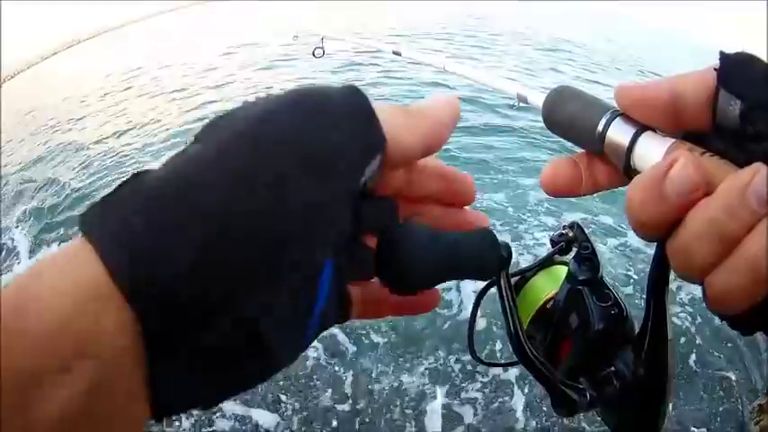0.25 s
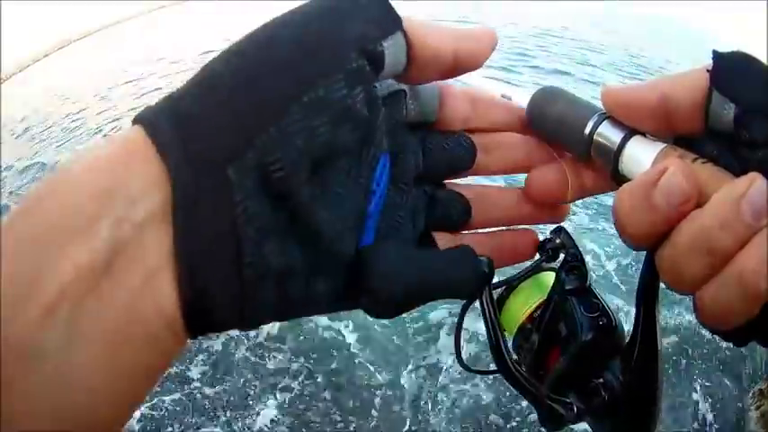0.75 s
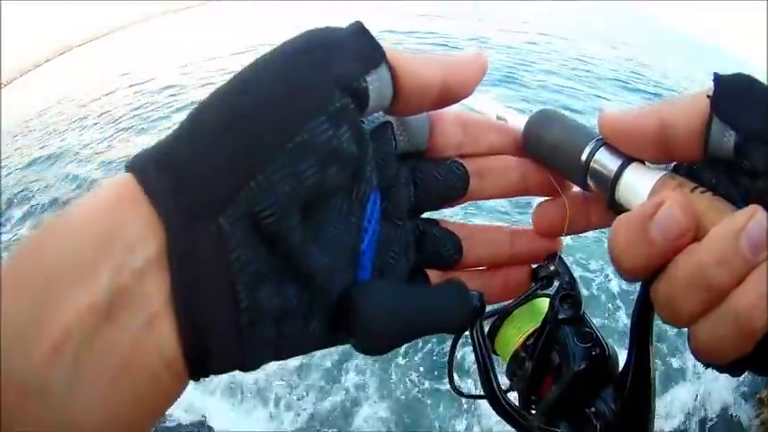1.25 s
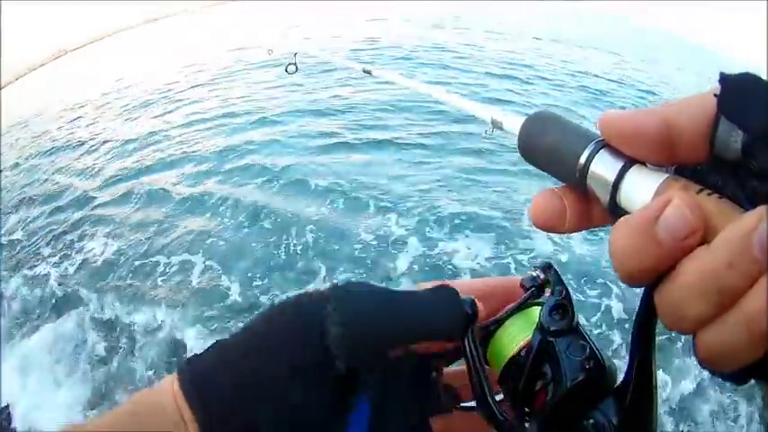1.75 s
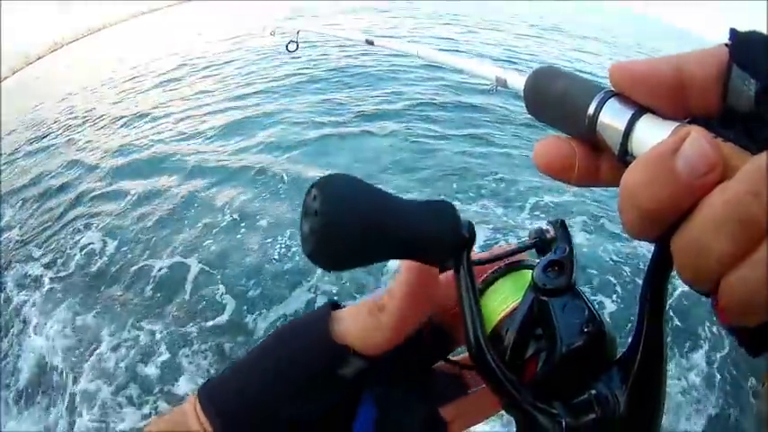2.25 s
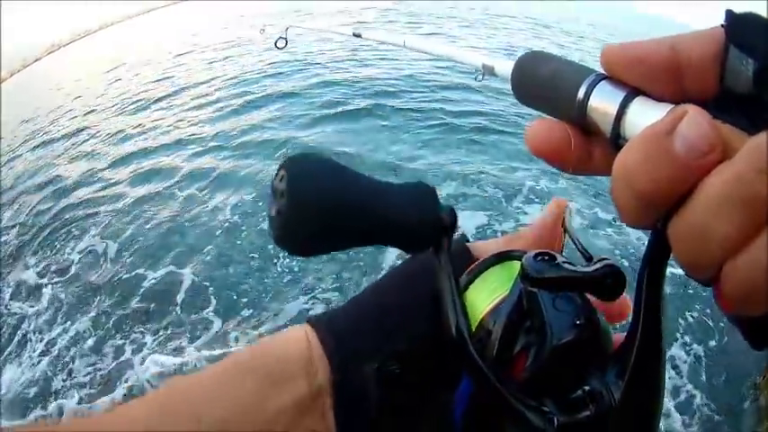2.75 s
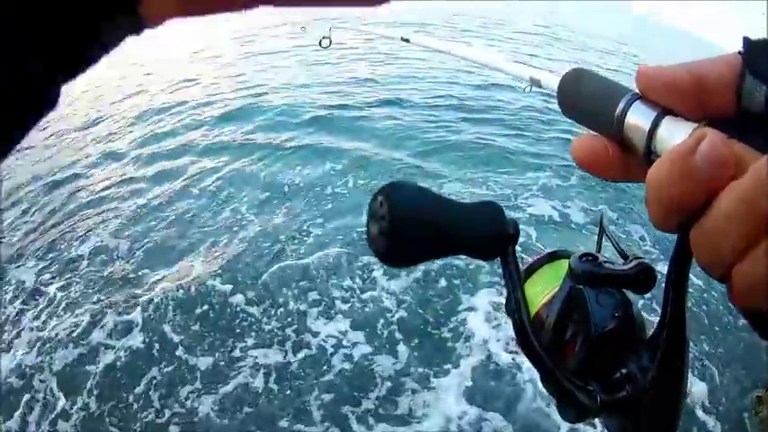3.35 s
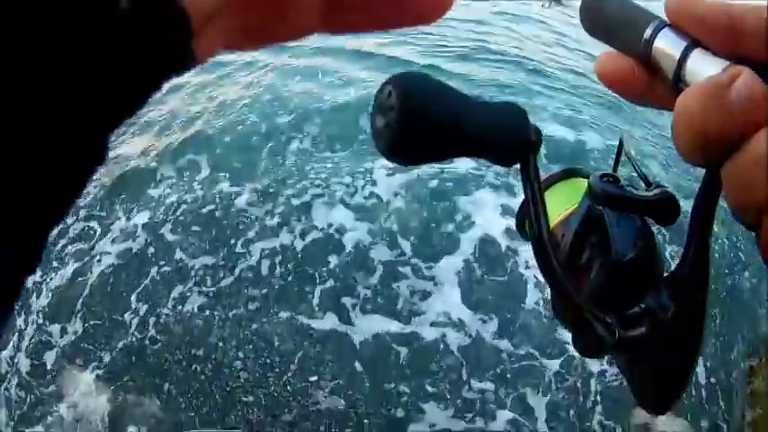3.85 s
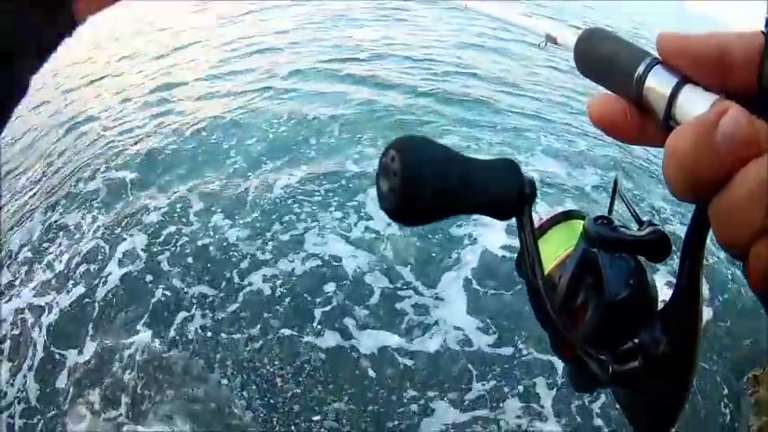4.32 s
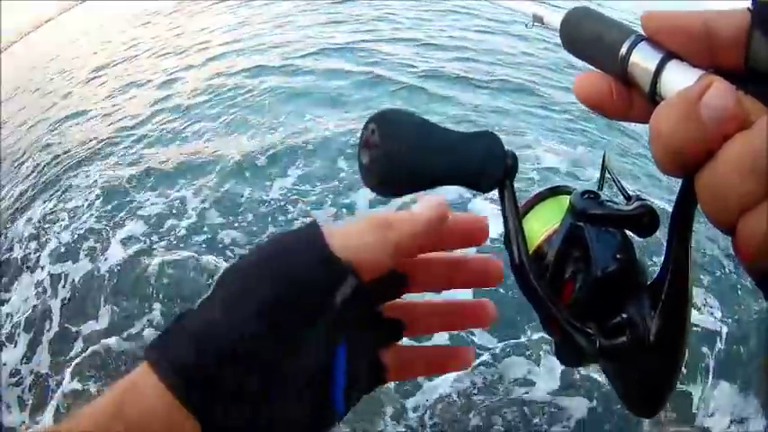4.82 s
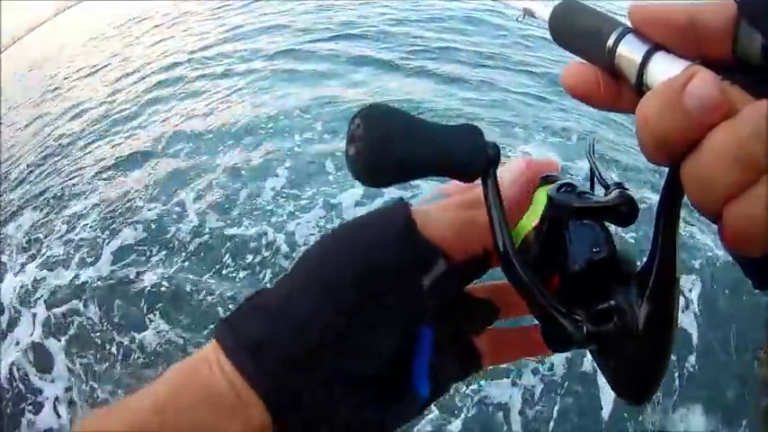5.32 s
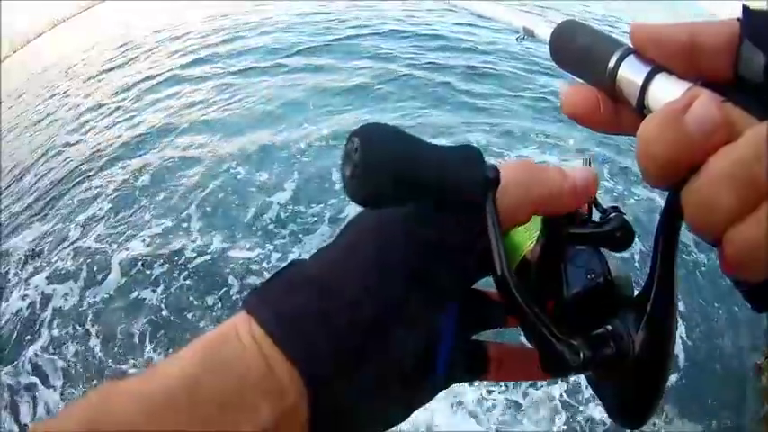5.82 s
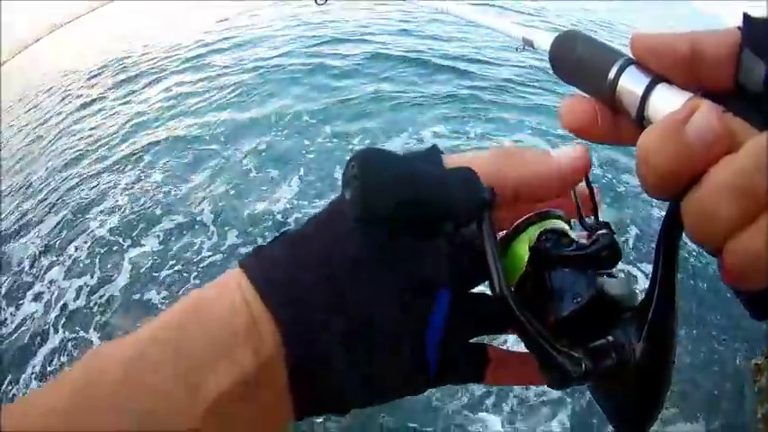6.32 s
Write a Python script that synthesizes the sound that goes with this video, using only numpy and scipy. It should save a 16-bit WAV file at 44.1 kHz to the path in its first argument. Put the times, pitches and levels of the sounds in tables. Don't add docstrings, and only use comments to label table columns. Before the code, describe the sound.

Small waves wash over stones, with bubbling trickles and fizzing foam, heard through a hard camera case that gives a hollow, boxy colour. A swell crests early, then drains to calm lapping. In the lull comes a very loud sharp knock on the case, a duller thump with a short squeak, then a hard metallic reel clack. A second, softer choppy swell follows over faint hum and hiss.

```python
import sys
import numpy as np
from scipy import signal
from scipy.fft import rfft, irfft, next_fast_len
from scipy.io import wavfile
from scipy.ndimage import uniform_filter1d, map_coordinates

SR = 44100
rng = np.random.default_rng(int(sys.argv[2]) if len(sys.argv) > 2 else 0)


def magnitude_from_level(level_db):
    exponent = np.asarray(level_db, float) / 20
    return 10 ** exponent


def unload_audio(sound):
    columns = np.transpose(np.atleast_2d(sound))
    steps = np.round(np.clip(columns, -1, 1) * 32767)
    wavfile.write(sys.argv[1], SR, steps.astype(np.int16))


N = 290178

# (frequency [Hz], level [dB per Hz])
WASH = [(200, -14), (600, -12.5), (1200, -10), (1600, -4.5), (2000, -17.5), (2500, -35), (5000, -74)]
# (frequency [Hz], level [dB per Hz])
FOAM = [(2000, -16), (2900, 0), (4500, -4), (5300, -12), (7200, -15), (8000, -23.5), (9500, -27)]
# (frequency [Hz], width [Hz], level [dB])
CAVITY = [(1413, 170, 6), (1860, 200, 2.5), (2320, 200, 3), (2780, 260, -6), (2810, 120, 9.5),
          (3430, 200, 9), (4010, 200, 4), (4310, 200, 7.5), (4640, 204, 5), (5760, 300, 4.5),
          (7000, 380, 8)]


def unit(x):
    return x / np.sqrt(np.mean(x ** 2) + 1e-20)


def along(points, hz):
    f, v = np.transpose(points)
    return np.interp(np.log(hz + 1), np.log(f + 1), v)


def wobble(rate):
    knots = rng.standard_normal(int(N * rate / SR) + 4)
    return map_coordinates(knots, [np.arange(N) * rate / SR])


def coloured(x, spectrum, peaks=()):
    m = next_fast_len(N + 8192)
    hz = np.fft.rfftfreq(m, 1 / SR)
    db = along(spectrum, hz)
    for centre, width, top_db in peaks:
        db = db + top_db / (1 + (2 * (hz - centre) / width) ** 2)
    return unit(irfft(rfft(x, m) * magnitude_from_level(db), m)[:N])


def patchy(depth_db):
    z = signal.stft(rng.standard_normal(N), nperseg=512)[2]
    field = uniform_filter1d(rng.standard_normal(z.shape), size=6, axis=0)
    field = uniform_filter1d(field, size=10, axis=1)
    return unit(signal.istft(z * magnitude_from_level(depth_db * unit(field)), nperseg=512)[1][:N])


def bubbles(count, centre_hz, spread, cycles, size_db):
    draw, t = rng.random((count, 2)), np.arange(400) / SR
    hz = np.clip(centre_hz * np.exp(spread * rng.standard_normal((count, 1))), 150, 9000)
    size = magnitude_from_level(size_db * draw[:, 1:])
    u = t * hz / cycles
    swing = np.sin(2 * np.pi * hz * t * (1 + 0.067 * u))
    tone = size * swing * u * np.exp(-3 * u)
    at = (draw[:, :1] * N).astype(int) + np.arange(len(t))
    return unit(np.bincount(at.ravel(), tone.ravel(), N + len(t))[:N])


def flow(spray, ebb=1):
    # (crest time [s], strength [dB], building [dB/s], draining [dB/s],
    # spray over strength [dB])
    waves = [(.4, -67.5, 20, 20, -2), (.93, -59, 29, 11, 1), (1.2, -59, 18, 12, 2),
             (1.57, -49, 27, 35, -1.5), (1.85, -54.5, 30, 18, -1), (2.1, -52, 23, 21, 0.5),
             (2.33, -62.5, 14, 51, 1.5), (2.6, -67, 42, 43, 1.5), (2.9, -63.5, 27, 25, 2),
             (3.55, -63, 17, 11, -0.5), (4.75, -63.5, 29, 20, -2), (4.99, -58.5, 36, 63, -0.5),
             (5.22, -57, 49, 40, -2), (5.31, -52, 80, 80, -0.5), (5.42, -57, 39.5, 30, -3.5),
             (5.8, -62, 110, 40, 4), (5.91, -54, 45, 70, 4), (6.16, -64, 43, 12, 2)]
    calm_db, crest_s = -70.5, 0.017
    crest, db, builds, drains, spray_db = np.transpose(waves)[:, :, None]
    t = np.arange(0, N + 64, 64) / SR
    slope = np.where(t < crest, builds, ebb * drains)
    fall_db = slope * (np.hypot(t - crest, crest_s) - crest_s)
    power = (magnitude_from_level(db + spray * spray_db - fall_db) ** 2).sum(axis=0) + magnitude_from_level(calm_db) ** 2
    return np.interp(np.arange(N) / SR, t, 10 * np.log10(power) + 60)


def wash(splash):
    drops = bubbles(count=6000, centre_hz=1208, spread=.4, cycles=3.8, size_db=7.5)
    water = coloured(patchy(0.41) + 0.26 * drops, WASH, CAVITY)
    return magnitude_from_level(flow(0) - 60 + splash) * water


def trickle(splash):
    # (frequency [Hz], level [dB per Hz])
    trickle_colour = [(1000, -28.5), (1500, -1.5), (1800, -2), (2200, -4), (2500, -16), (3000, -41.5)]
    drops = bubbles(count=4000, centre_hz=2003, spread=0.18, cycles=6, size_db=12)
    water = coloured(patchy(0.87) + 0.25 * drops, trickle_colour, CAVITY)
    return magnitude_from_level(-68 + .9 * flow(1.4) + splash) * water


def cupped(fizz):
    comes_s, leaves_s, band_hz, level_db = .45, 1.7, (4400, 4800), -13
    t = np.arange(N) / SR
    near = np.clip(np.minimum(t - comes_s, leaves_s - t) / .15, 0, 1)
    band = signal.butter(1, band_hz, "band", fs=SR, output="sos")
    return magnitude_from_level(level_db) * near * unit(signal.sosfilt(band, fizz))


def foam(splash):
    drops = bubbles(count=9000, centre_hz=4190, spread=0.39, cycles=4, size_db=13)
    fizz = coloured(patchy(0.94) + 0.36 * drops, FOAM, CAVITY)
    level_db = -76.5 + 0.99 * flow(0.57)
    return magnitude_from_level(level_db + 0.49 * splash) * (fizz + cupped(fizz))


def surge(splash):
    # (frequency [Hz], level [dB per Hz])
    surge_colour = [(60, -23.5), (200, -2.5), (400, -2), (800, -1), (1300, -1), (2500, -51.5)]
    drops = bubbles(count=1500, centre_hz=450, spread=.45, cycles=3.45, size_db=9.5)
    water = coloured(patchy(1.4) + 0.21 * drops, surge_colour)
    level_db = -62.5 + .6 * flow(-.8, ebb=1.5)
    return magnitude_from_level(level_db + 0.34 * splash) * water


def distant_swell():
    # (frequency [Hz], level [dB per Hz])
    rumble_colour = [(12, -35), (20, -10.5), (60, -5.5), (128, -7.5), (149, -9), (235, -10), (269, -11),
                     (500, -23.5), (650, -57), (1100, -120)]
    return magnitude_from_level(-63.5 + 0.78 * wobble(6.2)) * coloured(patchy(0.98), rumble_colour)


def sea():
    splash = 0.34 * wobble(16) + 0.77 * wobble(45)
    return wash(splash) + trickle(splash) + foam(splash) + surge(splash) + distant_swell()


def electronics():
    # (frequency [Hz], rms level [dB], unsteadiness [Hz])
    hum_lines = [(58.5, -69.5, 21), (116.4, -71.5, 12), (169.5, -75.5, 23)]
    # (frequency [Hz], level [dB per Hz])
    hiss_colour = [(1500, -30.5), (2500, 4), (3200, -3.5), (4500, -6), (5000, -5.5), (6700, -7.5),
                   (8600, -8.5), (11500, -10), (12600, -7), (13500, -7), (15500, -5)]
    t = np.arange(N) / SR
    hum = np.zeros(N)
    for hz, db, drift in hum_lines:
        swell = 1 + 0.35 * wobble(drift)
        hum += magnitude_from_level(db) * unit(swell * np.sin(2 * np.pi * hz * t + 1.3 * wobble(drift)))
    return hum + magnitude_from_level(-76) * coloured(rng.standard_normal(N), hiss_colour)


def flexes(rows):
    out, t = np.zeros(N + SR), np.arange(SR // 8) / SR
    for s, db, hz, cycles in rows:
        u = t * hz / cycles
        out[round(s * SR):][:len(t)] -= magnitude_from_level(db + 12) * np.sin(2 * np.pi * hz * t) * u * np.exp(-3 * u)
    return out[:N]


def squeaks():
    # (time [s], level [dB], frequency [Hz], length [cycles])
    short_tones = [(3.631, -47, 1500, 9), (3.4875, -40, 1970, 7), (3.499, -42, 2240, 6.7),
                   (3.5045, -37, 1800, 5.8), (3.5065, -34, 2190, 7.1), (3.5205, -48, 1900, 6.6),
                   (3.8597, -24, 3460, 7.7), (3.864, -40, 4300, 36), (4.0725, -42, 2340, 13),
                   (4.1068, -35.5, 4300, 8.1), (.655, -62, 4970, 18), (2.7235, -59, 5800, 14),
                   (2.7235, -59, 4500, 12), (4.1068, -32.5, 2150, 9.5), (4.0515, -37, 1420, 9),
                   (4.0845, -53, 2570, 13), (3.868, -51, 7000, 36)]
    return flexes(short_tones)


def struck(hits, modes, split_hz, rise):
    out, t = np.zeros(N + SR), np.arange(SR // 8) / SR
    dull = coloured(rng.standard_normal(N), WASH, CAVITY)
    bright = coloured(rng.standard_normal(N), FOAM, CAVITY)
    for s, db, bright_db, dull_rattle_db, bright_rattle_db, rattle_t60 in hits:
        at = int(s * SR)
        u = np.maximum(t - (s - at / SR), 0)
        load = (1 - np.exp(-u / rise)) ** 2
        ring = np.zeros(len(t))
        for hz, level, t60 in modes:
            mode_db = level + bright_db * (hz > split_hz) - 60 * u / t60
            ring += magnitude_from_level(mode_db) * np.sin(2 * np.pi * hz * u)
        ring *= load
        rattle = magnitude_from_level(dull_rattle_db) * dull[at:][:len(t)] + magnitude_from_level(bright_rattle_db) * bright[at:][:len(t)]
        out[at:][:len(t)] += magnitude_from_level(db) * ring / np.abs(ring).max() + load * magnitude_from_level(-60 * u / rattle_t60) * rattle
    return out[:N]


def reel():
    # (time [s], blow [dB], fizz [dB])
    light = [
        (.66, -70, -65),
        (2.7226, -62, -63),
        (2.733, -70, -64),
        (3.4858, -58, -58),
        (3.703, -73, -70),
        (3.9455, -60.5, -62),
        (4.0445, -54, -65),
    ]
    # (time [s], blow [dB], bright [dB], rattle [dB], rattle t60 [s])
    heavy = [(3.4885, -64, -9, -62, .01), (3.4990, -61, 12, -46.5, 0.035), (3.506, -51, 8, -41, 0.0092),
             (3.5215, -64, 0, -59, .015), (4.0520, -43, -4, -49.5, 0.055), (4.071, -52, -4, -47, .037),
             (4.0813, -27.5, -15, -90, .01), (4.08414, -19, -15, -90, .01), (4.08465, -18.5, 8, -48, .02),
             (4.0884, -31, 5, -55, .04), (4.1062, -42, 7, -32, 0.012)]
    # (frequency [Hz], level [dB], t60 [s])
    reel_modes = [(433, -13, .04), (600, -8, .04), (880, 6, .0155), (1434, 2, .016), (1851, 9, .007),
                  (2113, -13, .014), (2387, 1, .004), (2696, -18, .017), (3336, -14, .011),
                  (4035, -26, .012), (5720, -36, .012), (7270, -27, .004)]
    ticks = [(s, db, 16, fizz - 14, fizz, 0.019) for s, db, fizz in light]
    clacks = [(s, db, bright, rattle, rattle - 9, t60) for s, db, bright, rattle, t60 in heavy]
    return struck(ticks + clacks, reel_modes, split_hz=2300, rise=.0002)


def bumps():
    # (time [s], level [dB], frequency [Hz], length [cycles])
    thuds = [(2.6, -47, 120, 1.4), (3.519, -50, 500, 3), (1.54, -46, 290, 3.5), (3.492, -36, 53.4, 1.8),
             (3.651, -40, 90, 0.96), (3.652, -45, 160, 1.5), (3.555, -51, 450, 4), (3.615, -48, 140, 1.6),
             (3.862, -25, 100, 1.4), (3.868, -31.5, 297, 1.9), (3.871, -31, 191, 3.1),
             (3.888, -38, 110, 1.2), (3.9745, -36, 170, 1.4), (3.9795, -41, 520, 2.2),
             (3.863, -29, 530, 7.1), (4.009, -42.5, 450, 3.1), (4.051, -41, 89, 1.3),
             (4.078, -29, 93, 0.59), (4.1068, -32.5, 567, 4.4), (5.228, -42, 170, 1.2),
             (5.305, -36.5, 700, 3.2)]
    return flexes(thuds)


def case_knocks():
    # (time [s], blow [dB], bright [dB], rattle [dB], rattle t60 [s])
    blows = [
        (3.64884, -14, 15, -90, .01),
        (3.64944, -.5, -7, -90, .01),
        (3.64999, -9.5, 5, -41, .03),
        (3.8575, -29, -14, -80, .01),
        (3.8595, -14, -15, -44, .03),
        (3.8640, -40, -6, -39, .05),
        (3.8700, -36, -12, -44, .05),
    ]
    # (frequency [Hz], level [dB], t60 [s])
    shell_modes = [(531, -14, .025), (655, -22, .04), (1187, -17.5, .028), (1434, -6.5, .013),
                   (1553, -5, .013), (2076, -1, .0048), (3046, -2, .006), (3400, -9, .0077),
                   (3817, -8.5, .0046), (4558, -17, .015), (5125, -17.5, .0042), (6410, -32, .016),
                   (7420, -28, .004)]
    knocks = [(s, db, bright, rattle, rattle - 11, t60) for s, db, bright, rattle, t60 in blows]
    return struck(knocks, shell_modes, split_hz=2000, rise=.0003)


def through_wall(x):
    x = signal.sosfilt(signal.butter(2, 330, "high", fs=SR, output="sos"), x)
    return signal.sosfilt(signal.cheby1(10, 1, 7450, fs=SR, output="sos"), x)


def snaps():
    # (time [s], level [dB])
    crackles = [
        (3.6497, -49.5),
        (4.084, -61),
        (4.1070, -70),
    ]
    out, t = np.zeros(N), np.arange(64) / SR
    for s, db in crackles:
        grains = (rng.random(len(t)) < .12) * 3
        out[round(s * SR):][:len(t)] = magnitude_from_level(db + 6.0) * np.hanning(len(t)) * grains
    return signal.sosfilt(signal.butter(4, [8200, 13500], "band", fs=SR, output="sos"), out)


def scene():
    rings = through_wall(reel() + case_knocks())
    return (sea() + squeaks() + rings + bumps() + snaps())[None]


def roll_off(x):
    return signal.sosfilt(signal.butter(12, 15940, fs=SR, output="sos"), x)


def record(dry):
    spectrum = rfft(dry + electronics())
    heard = irfft(spectrum * (np.fft.rfftfreq(N, 1 / SR) < 15900), N)
    return roll_off(heard)


dry = scene()
out = record(dry)
unload_audio(out)
```